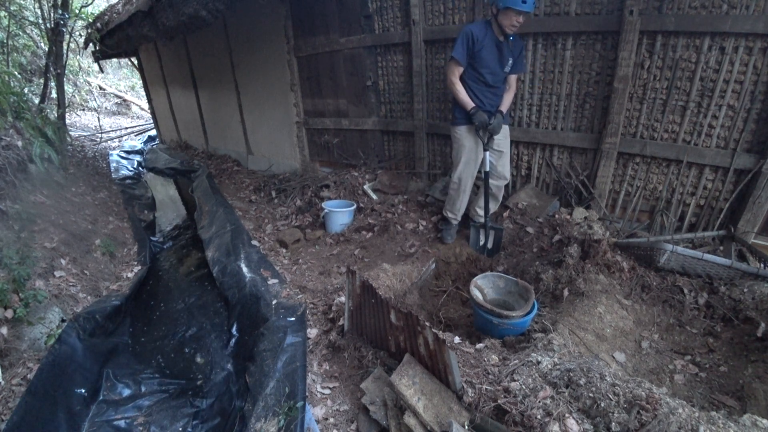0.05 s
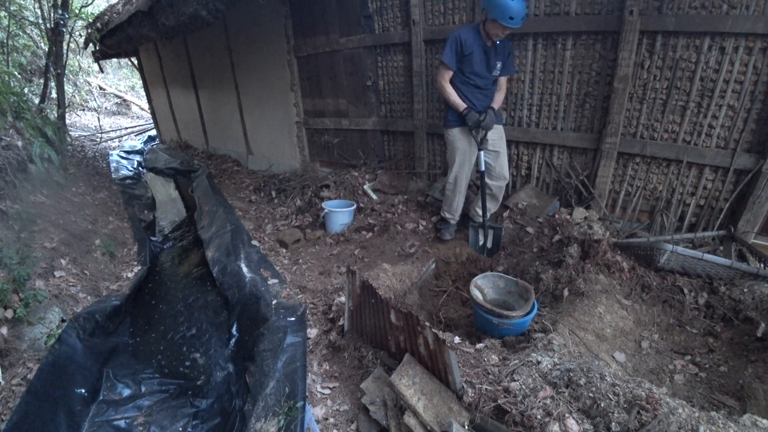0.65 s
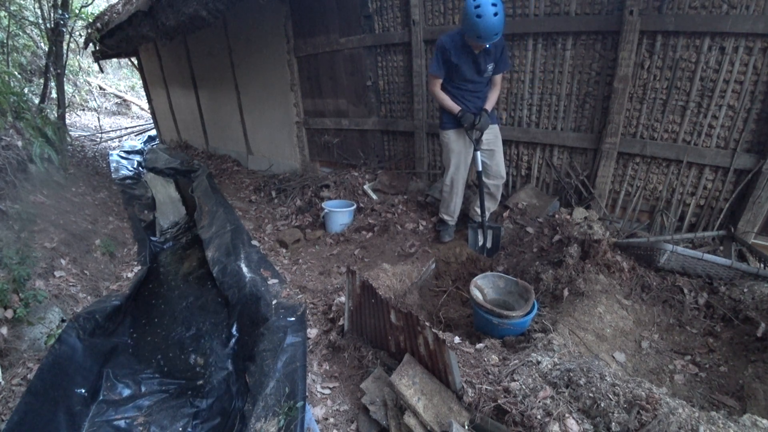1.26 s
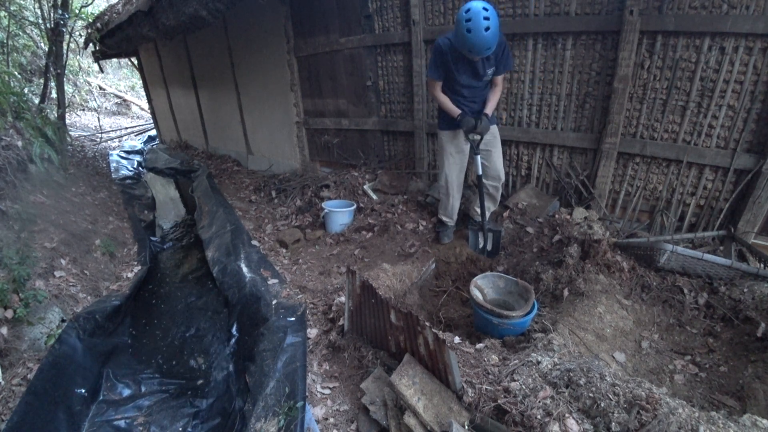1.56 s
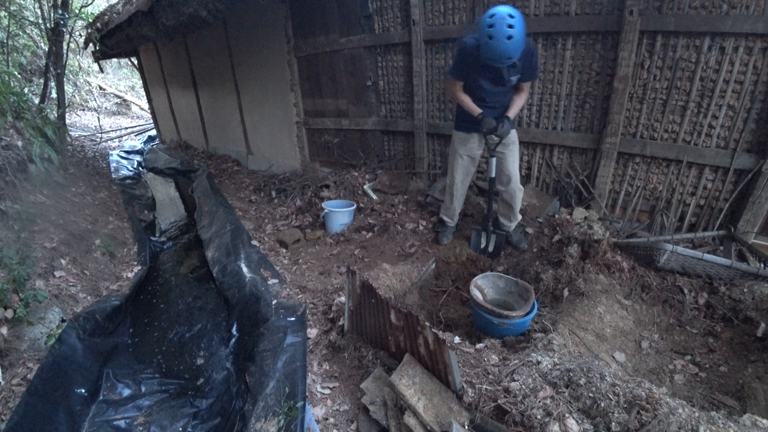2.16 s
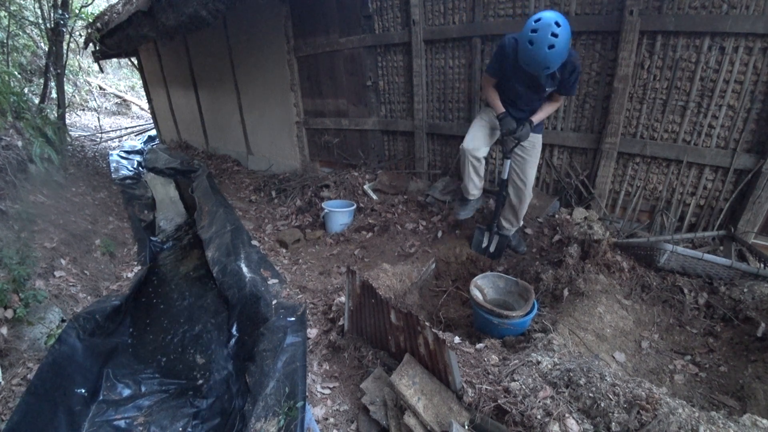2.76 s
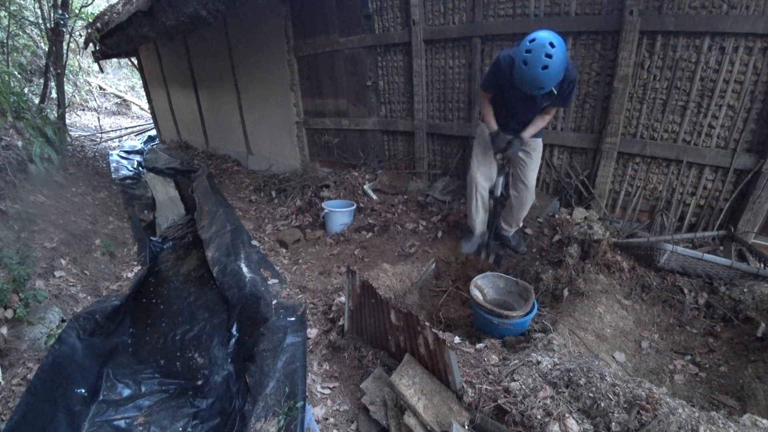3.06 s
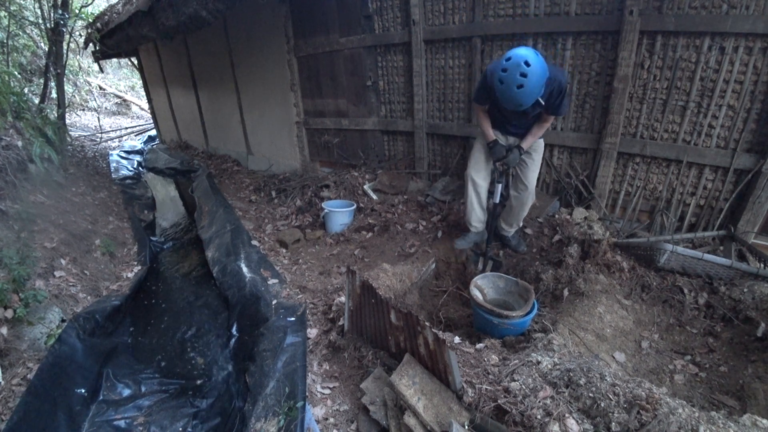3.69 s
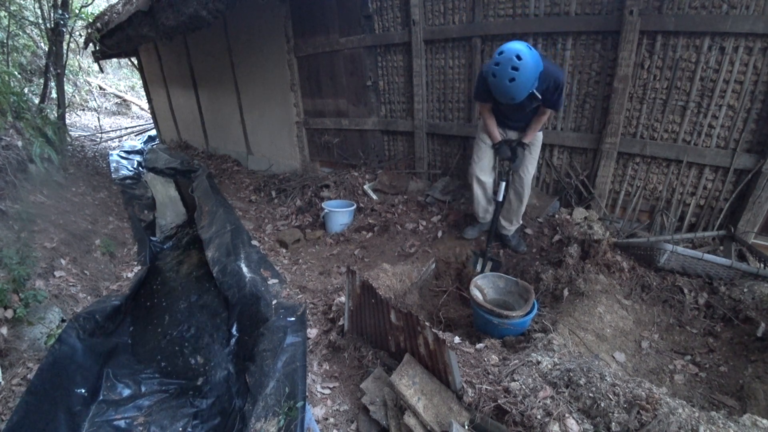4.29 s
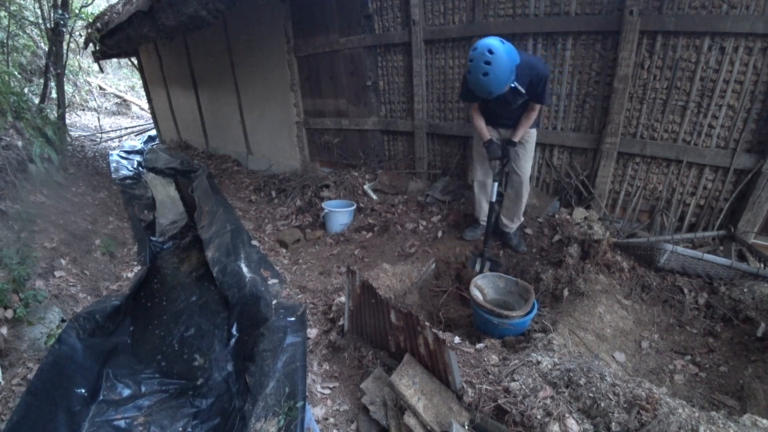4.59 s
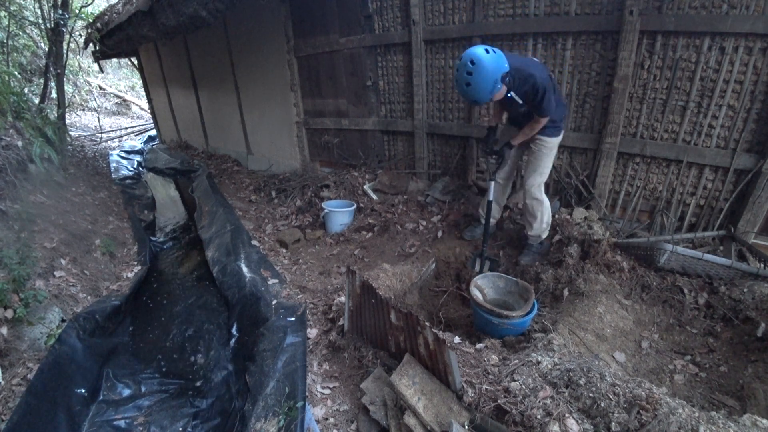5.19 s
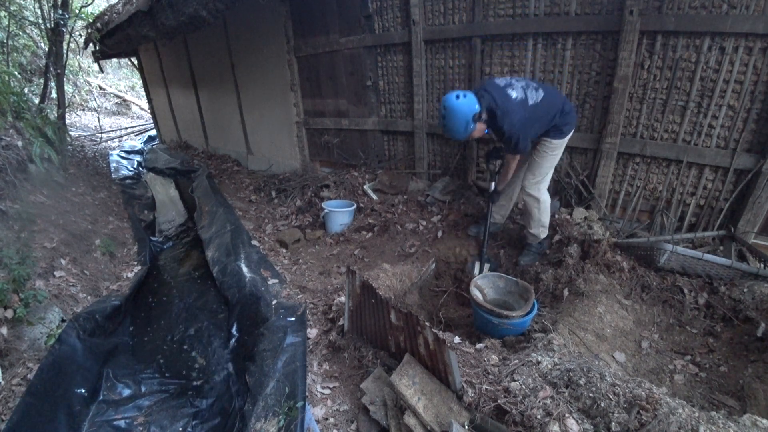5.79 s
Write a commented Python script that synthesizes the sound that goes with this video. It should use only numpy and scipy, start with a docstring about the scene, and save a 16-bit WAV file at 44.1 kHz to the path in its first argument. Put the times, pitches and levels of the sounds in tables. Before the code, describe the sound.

A steel spade scrapes into stony soil with a brief metallic ring, then grinds deeper in slow shoves, earth rumbling and stones ticking against the blade. A boot drives it down with a crunch and dull knocks. Near the end the blade creaks faintly as it is levered, and loose soil trickles over it. The sound is very close, as if heard through the tool itself, on the right over a faint hiss.

```python
"""Spade in stony soil

A steel spade is pushed, trodden and levered into the ground, heard through the tool itself on the right.
The free blade sings as it scrapes in, until the soil damps it; then earth rumbles and crackles along it
and stones tick on the steel. A boot drives it down with a crunch, the blade creaks as it is levered,
and loose soil slides as the load is lifted."""
import sys
import numpy as np
from scipy import signal
from scipy.fft import rfft, irfft, next_fast_len
from scipy.io import wavfile

SR = 44100
rng = np.random.default_rng(int(sys.argv[2]) if len(sys.argv) > 2 else 0)


def wav_out(sig):
    """Save sig, one row per channel (or a flat mono array), as 16-bit PCM at SR to the path in sys.argv[1]."""
    wavfile.write(sys.argv[1], SR, np.round(np.clip(np.atleast_2d(sig).T, -1, 1) * 32767).astype(np.int16))


N = 266408
TIME = np.arange(N) / SR

# bright spectrum of grit on steel: f/Hz, level/dB
GRIT_EQ = [(300, -40), (1200, -35), (2000, 7.5), (2700, 9), (3500, 9), (4400, 3), (5400, 5.5), (6500, -1.5),
           (8500, -2.5), (11000, -11.5)]
# damped resonances of the buried spade: f/Hz, width/Hz, level/dB
BURIED_MODES = [(620, 208, 3.5), (1045, 254, 1), (1340, 120, 4), (1635, 170, -2.5), (2135, 240, -11),
                (2600, 72, -2.5), (2754, 130, -14), (4170, 120, -20), (4360, 130, -19)]


def undb(db):
    """Decibels to gain."""
    return 10 ** (np.asarray(db) / 20)


def unit(x):
    """Scale to an rms of one."""
    return x / np.sqrt(np.mean(x ** 2) + 1e-18)


def shape(x, response):
    """Filter x by a gain given as a function of frequency."""
    size = next_fast_len(len(x) + SR // 10)
    hz = np.maximum(np.arange(size // 2 + 1) * SR / size, 1)
    return irfft(rfft(x, size) * response(hz), size)[:len(x)]


def colour(x, points):
    """EQ x along a curve of points: f/Hz, level/dB."""
    hz, db = np.transpose(points)
    return shape(x, lambda f: undb(np.interp(np.log(f), np.log(hz), db)))


def resonate(x, modes):
    """Ring a set of resonances (f/Hz, width/Hz, level/dB); neighbours move in opposite senses."""
    return shape(x, lambda f: sum((-1) ** k * undb(db) / (1 + 1j * (f * f - hz * hz) / (f * width))
                                  for k, (hz, width, db) in enumerate(modes)))


def grains(rate, spread_db):
    """Random clicks, about `rate` a second, mostly small and a few large."""
    sizes = undb(spread_db * np.minimum(rng.exponential(size=N), 4))
    hits = rng.random(N) < rate / SR
    return unit(hits * sizes * rng.choice([-1, 1], N))


def walk(rate):
    """A random drift of rms one that takes `rate` new values a second."""
    count = int(N / SR * rate) + 2
    return unit(np.interp(TIME * rate, np.arange(count), rng.standard_normal(count)))


def gate(start, attack, length, release):
    """Rise, hold and fall back to silence within a given length."""
    return np.clip(np.minimum((TIME - start) / attack, (start + length - TIME) / release), 0, 1)


def ping(t, hz, ring):
    """A few cycles of tone that swell and are quickly smothered by the soil."""
    attack = 1 - np.exp(-t / 0.0002)
    return np.sin(2 * np.pi * hz * t) * attack * np.exp(-(t / ring * 1.08) ** 2)


def add(track, start, sound):
    """Mix a sound in at a time in seconds."""
    i = max(int(start * SR), 0)
    track[i:i + len(sound)] += sound[:N - i]


def entry_scrape():
    """Dense grit rasps on the steel and rings the free blade; its upper modes die first as it sinks."""
    # modes of the free blade: f/Hz, width/Hz, level/dB
    blade_modes = [(292, 12, -11), (629, 11, 2), (652, 20, -5), (682, 16, -2), (750, 16, -1),
                   (800, 40, -10), (890, 25, -8), (986, 20, 3), (1030, 40, -6), (1119, 25, -11),
                   (1320, 25, -12), (1364, 25, -7), (1431, 20, -4), (1836, 20, -14), (1873, 22, -17),
                   (2160, 30, -24), (2476, 70, -22), (2622, 50, -22), (2740, 60, -23), (3942, 60, -28),
                   (5170, 150, -34), (5650, 70, -35)]
    # grit rasping on bare steel: f/Hz, level/dB
    rasp_eq = [(150, -14.5), (300, -18), (480, -11.5), (650, 1.5), (1000, 5), (1200, -4), (1700, -8.5),
               (2000, -17), (2600, -14), (3200, -23.5), (5000, -26.5), (10000, -38)]
    split_hz, hold_s = 1200, 0.16
    grit = grains(rate=5000, spread_db=2.5)
    lower = unit(resonate(grit, [mode for mode in blade_modes if mode[0] < split_hz]))
    upper = unit(resonate(grit, [mode for mode in blade_modes if mode[0] >= split_hz]))
    rasp = unit(colour(grains(rate=4000, spread_db=2.5), rasp_eq))
    upper_db = -5.5 - 54 * np.minimum(TIME, hold_s)
    # after the hold, the soil grips and damps the whole blade
    level_db = -16 - 53 * np.maximum(TIME - hold_s, 0)
    free = np.interp(TIME, [0.5, 0.66], [1, 0])
    return free * undb(level_db) * (undb(-2.7) * lower + undb(upper_db) * upper + undb(-5) * rasp)


def shove_envelope(layer, fade_share=1):
    """Gain of one soil layer: each shove builds up, mostly fades as the ground brakes it, and stops."""
    # shoves of the blade: t/s, rise/s, length/s, rubbing fade/(dB/s), strength/dB,
    # stoniness/dB, crumbs/dB, rumble/dB
    shoves = [(0.0, 0.29, 0.7, 17, -33.5, -1.5, -4.5, -1), (0.56, 0.18, 0.81, 13.5, -44.5, -0.5, 0, 3),
              (1.274, 0.15, 0.22, 40, -42.5, 0, -22, -1), (1.446, 0.063, 1.77, 19.5, -33.5, 1, -6, -2.5),
              (2.255, 0.11, 0.81, 50, -39, -2.5, -8, -3), (3.017, 0.06, 1.09, 20.5, -45.5, 0, -2, 2),
              (3.29, 0.093, 0.53, 15, -51, 0.5, 1, -7), (3.623, 0.066, 0.13, 64, -44.5, -6, -9, 1),
              (3.796, 0.18, 0.8, -20, -58, -5, -8, -2), (4.272, 0.018, 1.02, 21, -48.5, 1.5, -4.5, 3.5),
              (4.424, 0.19, 0.88, 23, -50.5, 1, -4, 0), (4.746, 0.092, 0.63, 27, -56.5, -9, -0.5, -4),
              (5.077, 0.17, 0.28, 5, -57.5, 3, 10.5, 6.5), (5.296, 0.053, 0.43, 10, -65, -1, 12.5, 5),
              (5.58, 0.11, 0.73, 10, -53.5, 2.5, 2.5, 1.5)]
    energy = np.zeros(N)
    for start, rise, length, fade, db, stony_db, crumbs_db, rumble_db in shoves:
        moving = gate(start, rise, length, release=0.085)
        now = moving > 0
        braked_db = fade_share * fade * np.maximum(TIME[now] - start - rise, 0)
        layer_db = {"soft": -stony_db, "stony": stony_db, "crumbs": crumbs_db, "rumble": rumble_db}
        energy[now] += (moving[now] * undb(db + layer_db[layer] - braked_db)) ** 2
    return np.sqrt(energy)


def soil_shear():
    """Earth shears in small jerks: low rumble, dull and stony rubbing on the steel, crackling crumbs."""
    # weight of the shifting earth: f/Hz, level/dB
    rumble_eq = [(20, -38), (40, -15), (65, 2.5), (125, 0.5), (200, -1), (320, -3.5), (480, -11.5),
                 (800, -10), (2000, -40)]
    # dull rub of soft soil: f/Hz, level/dB
    soft_eq = [(200, -16), (400, -1.5), (620, 1.5), (900, -0.5), (1100, 1.5), (1400, -13.5), (2000, -32),
               (6000, -42)]
    # harder rub of stony soil: f/Hz, level/dB
    stony_eq = [(500, -20), (900, -1.5), (1150, -1), (1400, 4), (1650, 0), (1950, -6.5), (2500, -5.5),
                (3200, -14), (4300, -18.5), (7000, -58), (11000, -63)]
    jerks = undb(1.5 * walk(rate=60))
    rumble = unit(colour(grains(rate=900, spread_db=1), rumble_eq))
    soft = unit(colour(grains(rate=2500, spread_db=3), soft_eq)) * shove_envelope("soft")
    stony = unit(colour(grains(rate=3000, spread_db=3.5), stony_eq)) * shove_envelope("stony")
    crackle = crumb_cracks() + undb(-9.5) * unit(colour(grains(rate=780, spread_db=6), GRIT_EQ))
    # rumble and crackle outlast the rubbing
    rumble *= shove_envelope("rumble", fade_share=0.64)
    crackle *= shove_envelope("crumbs", fade_share=0.7)
    return (rumble + soft + stony) * jerks + crackle


def crumb_cracks(count=2000, range_db=13.5):
    """Crumbs crack on the blade and ring it briefly; the shorter the crack, the more its pitch strays."""
    t = TIME[:SR // 125]
    when, size, sustain = rng.random((3, count, 1))
    stray = (0.16 - 0.11 * sustain) * rng.standard_normal((count, 1))
    pings = undb(range_db * size ** 4) * ping(t, hz=2560 * np.exp(stray), ring=0.001 + 0.003 * sustain)
    places = (when * N).astype(int) + np.arange(len(t))
    cracks = unit(np.bincount(places.ravel(), pings.ravel(), N)[:N])
    # finer crumbs grind on in the same resonances
    grind = unit(resonate(grains(rate=900, spread_db=0.5), [(2400, 250, 0), (2570, 140, 0)]))
    return unit(cracks + undb(-3.5) * grind)


def hiss():
    """Steady hiss of the input stage."""
    # noise floor, tilted towards the bass: f/Hz, level/dB
    hiss_eq = [(20, 8.5), (100, 13.5), (400, 7.5), (1500, 5), (4000, 2), (7000, 0), (11000, -1)]
    return undb(-50) * unit(colour(rng.standard_normal(N), hiss_eq))


def stone_ticks():
    """A stone snaps past the edge: a ping, a broad click, and a short shudder of the shaft."""
    # larger stones striking the blade: t/s, level/dB, f/Hz, ring/s
    strikes = [(.387, -15.5, 2800, 0.0013), (0.466, -15, 2500, 0.0046), (0.479, -17, 1190, 0.012),
               (0.496, -11, 1434, 0.0049), (0.572, -23.5, 2560, 0.0037), (.614, -21.5, 2620, 0.0017),
               (.691, -29, 2400, 0.005), (.830, -31, 890, .0076), (.985, -29, 2430, .0053),
               (1.004, -27, 1500, 0.0052), (1.079, -29, 2950, 0.0096), (1.126, -26, 776, 0.0023),
               (1.142, -24.5, 2680, 0.0031), (1.4176, -6, 1175, 0.0038), (1.444, -11, 1310, 0.0048),
               (1.474, -27.5, 3300, 0.0054), (1.499, -21, 2660, 0.0076), (1.507, -19.5, 1160, 0.0073),
               (1.518, -25, 1340, 0.025), (1.538, -30, 3200, 0.0023), (1.624, -25.5, 2577, 0.012),
               (1.707, -24.5, 2580, 0.0066), (1.752, -29, 2930, .0038), (1.813, -26, 1540, 0.014),
               (1.825, -16, 2600, 0.0013), (1.93, -22.5, 2540, 0.0075), (2.273, -15.5, 1350, 0.0036),
               (2.289, -24.5, 1340, 0.0095), (2.354, -23, 2680, 0.0085), (2.411, -27.5, 910, 0.0079),
               (2.83, -37.5, 5200, 0.0024), (3.377, -32, 1180, 0.0067), (3.779, -35, 1420, 0.0067),
               (4.576, -29.5, 2500, .002), (4.687, -30.5, 1066, 0.01), (5.290, -31.5, 2450, 0.0058),
               (5.346, -34.5, 2440, 0.0087), (5.359, -35, 2900, .005), (5.613, -33, 2360, 0.0077),
               (5.739, -33.5, 2570, 0.0097)]
    click_eq = [(60, 20), (200, 23), (700, 1), (1700, 14.5), (3000, 2), (5000, -8), (11000, -46)]
    out, t = np.zeros(N), TIME[:SR // 12]
    for start, db, hz, ring in strikes:
        snap, shake = rng.standard_normal((2, len(t)))
        click = unit(colour(snap, click_eq)) * np.exp(-t / 0.004)
        band = [(hz, 800, 0)]
        shudder = unit(resonate(resonate(shake, band), band))
        shudder *= np.exp(-t / 0.0094) * (1 - np.exp(-t / 0.0042))
        add(out, start, undb(db) * (ping(t, hz, ring) + undb(-10) * shudder + undb(-14.5) * click))
    return out


def clod_thuds():
    """The ground gives with a short, low bump."""
    # clods breaking loose: t/s, level/dB, f/Hz
    clods = [(1.501, -19, 139), (2.286, -23.5, 143), (3.02, -28, 112), (3.087, -31, 71), (3.117, -27, 103),
             (3.194, -27.5, 111), (5.235, -33.5, 212), (5.27, -30, 189), (5.74, -34, 192)]
    out, t = np.zeros(N), TIME[:SR // 6]
    soft_attack = 1 - np.exp(-t / 0.0029)
    for start, db, hz in clods:
        add(out, start, undb(db) * ping(t, hz, ring=1.3 / hz) * soft_attack)
    return out


def boot_knocks():
    """A blunt contact rocks the whole spade for a few cycles and clanks its damped resonances."""
    # dull knocks of boot and shaft on the blade: t/s, level/dB, f/Hz, clank trim/dB
    contacts = [(3.019, -14.5, 1180, -0.5), (3.094, -24, 890, 4.5), (3.119, -17, 1080, -2),
                (3.64, -28, 795, 6), (4.025, -28.5, 730, -6.5), (4.178, -27.5, 666, -14),
                (4.283, -13, 650, -25), (4.287, -10.5, 840, -7), (5.396, -32.5, 800, -2.5),
                (5.588, -31.5, 660, -15), (5.649, -26.5, 437, -16)]
    out, t = np.zeros(N), TIME[:SR // 12]
    impulse = 1.0 * (t == 0)
    clank = resonate(impulse, BURIED_MODES)
    clank /= abs(clank).max()
    for start, db, hz, clank_db in contacts:
        rocking = ping(t, hz, ring=0.003) * (1 - np.exp(-t / 0.0006))
        add(out, start, undb(db) * (undb(-2.2) * rocking + undb(clank_db + 2) * clank))
    return out


def earth_crunch():
    """Packed earth gives way in bursts that knock the buried spade and spray grit over it."""
    # the edge breaking through: t/s, level/dB, length/s, grit trim/dB
    bursts = [(3.019, -15, 0.012, -27), (3.043, -16.5, 0.0075, -17.5), (3.051, -16, 0.019, -17.5),
              (3.07, -18, 0.016, -12), (3.087, -9.5, 0.0095, -11), (3.105, -21, 0.012, -20),
              (3.117, -9.5, 0.012, -24), (3.127, -12.5, 0.0052, -7), (3.146, -19.5, 0.0087, -8.5),
              (3.661, -26.5, 0.015, -27), (3.683, -28, 0.008, -26), (4.281, -20, 0.012, -12.5),
              (5.605, -41.5, 0.042, -3.5)]
    knock_eq = [(40, 22), (130, 3.5), (300, -2), (480, -7), (750, -9.5), (3000, -1), (6000, -14)]
    out, t = np.zeros(N), TIME[:SR // 10]
    for start, db, length, grit_db in bursts:
        push, spray = rng.standard_normal((2, len(t)))
        force = t / length * np.exp(-3 * t / length) + 0.048 * np.exp(-t / 0.035)
        knock = unit(colour(resonate(push * force, BURIED_MODES), knock_eq))
        grit = unit(colour(spray * force, GRIT_EQ))
        gain = undb(db - 9.5) * np.sqrt(length / t[-1])  # a longer burst carries more energy
        add(out, start, gain * (knock + undb(grit_db + 6.5) * grit))
    return out


def lever_creak():
    """The blade sticks and slips in one narrow resonance while the handle is pulled back."""
    # creaks against the soil: t/s, length/s, level/dB
    creaks = [(5.13, 0.094, -46), (5.242, 0.056, -43.5), (5.438, 0.043, -47.5)]
    levering = sum(undb(db) * gate(start, 0.02, length, release=0.015) for start, length, db in creaks)
    slips = grains(rate=1000, spread_db=4)
    return levering * unit(resonate(slips, [(1310, 96, 0)]))


def soil_slide():
    """Dry crumbs run over the rising blade, swelling and fluttering until the lift stops."""
    # loose soil running over steel: f/Hz, level/dB
    loose_eq = [(200, 1), (700, 7), (1300, 6), (1900, 2.5), (2600, 1.5), (3500, -4.5), (4500, -1),
                (5250, 3), (6200, -8), (8400, -9.5), (10000, -19)]
    start_s, swell_db_per_s, flutter_db = 5.585, 17, 2.5
    lifting = gate(start_s, attack=0.12, length=0.368, release=0.025)
    level_db = -47 + swell_db_per_s * (TIME - start_s) + flutter_db * walk(rate=25)
    trickle = unit(colour(grains(rate=3000, spread_db=4), loose_eq))
    return lifting * undb(level_db) * trickle


def scene():
    """The spade sits on the right; only a trace of it reaches the left, under a fainter hiss."""
    # bleed of the spade into the left channel: f/Hz, level/dB
    bleed_eq = [(100, -37), (700, -33), (2500, -47)]
    spade = entry_scrape() + soil_shear() + stone_ticks() + clod_thuds()
    spade += boot_knocks() + earth_crunch() + lever_creak() + soil_slide()
    left = colour(spade, bleed_eq) + undb(-10) * hiss()
    right = spade + hiss()
    return 2 * np.array([left, right])


def record(dry):
    """Clip the peaks just under full scale, then cut the top steeply above 11 kHz."""
    lowpass = signal.ellip(10, 0.2, 80, 11000, fs=SR, output="sos")
    return signal.sosfilt(lowpass, np.clip(dry, -0.92, 0.92))


dry = scene()
out = record(dry)
wav_out(out)
```